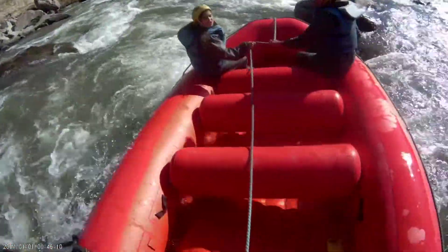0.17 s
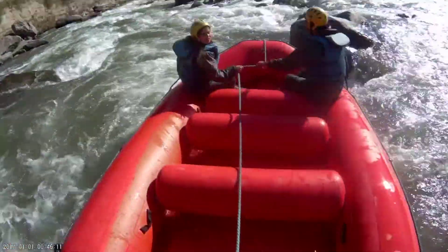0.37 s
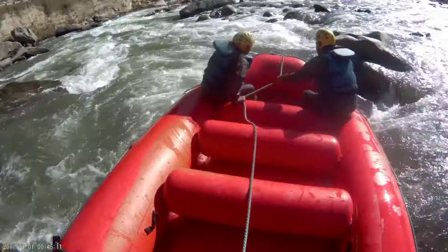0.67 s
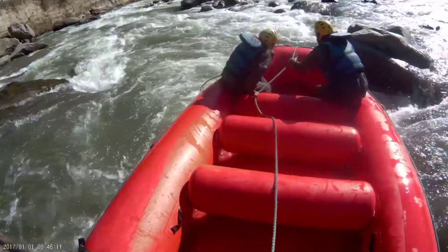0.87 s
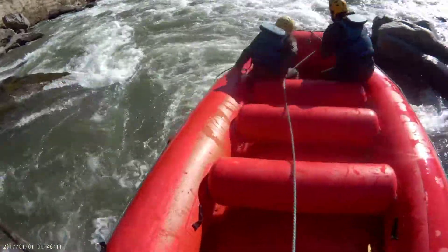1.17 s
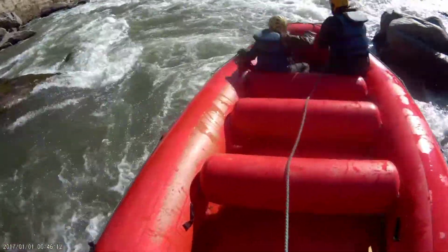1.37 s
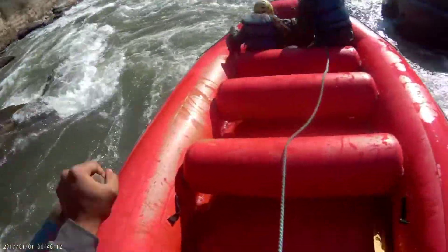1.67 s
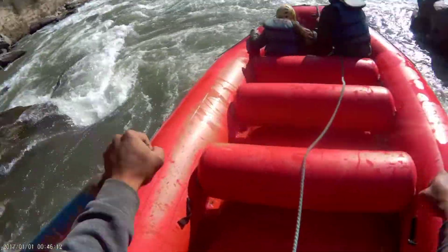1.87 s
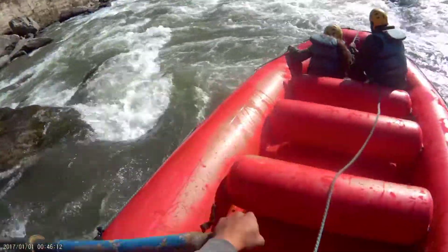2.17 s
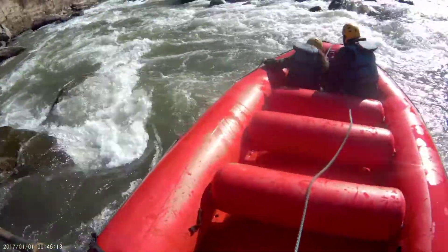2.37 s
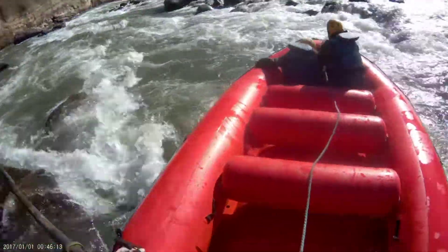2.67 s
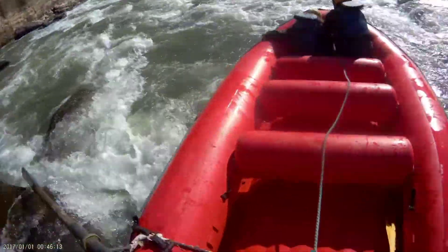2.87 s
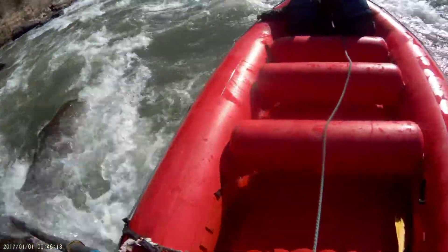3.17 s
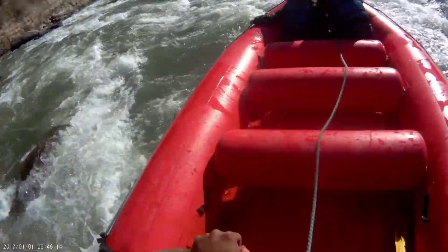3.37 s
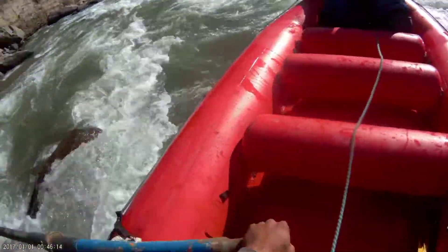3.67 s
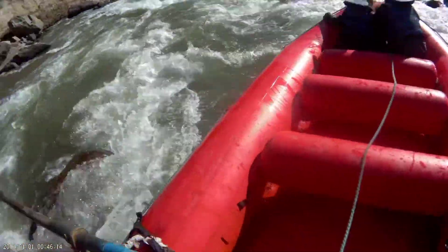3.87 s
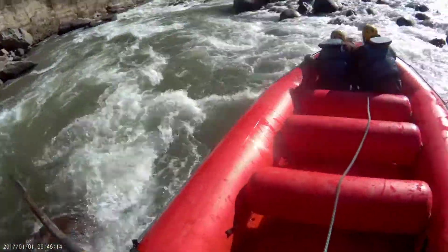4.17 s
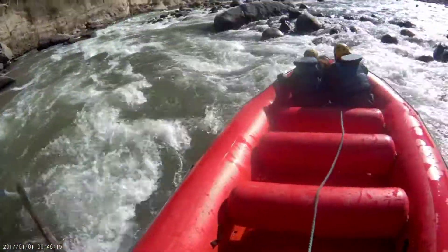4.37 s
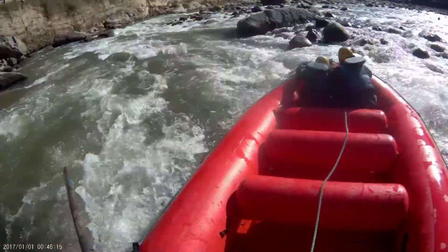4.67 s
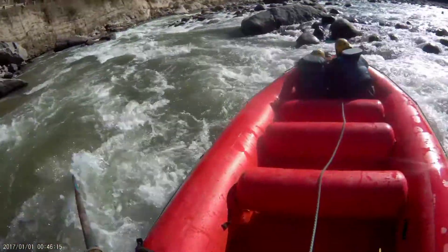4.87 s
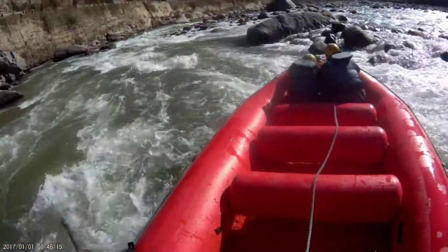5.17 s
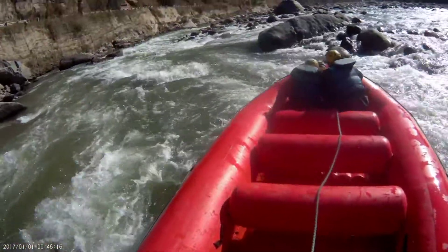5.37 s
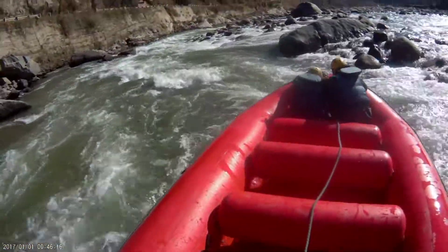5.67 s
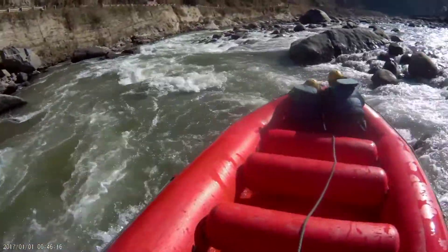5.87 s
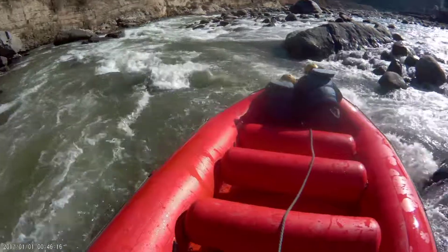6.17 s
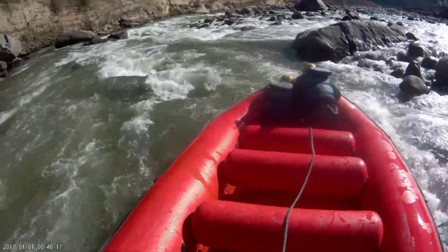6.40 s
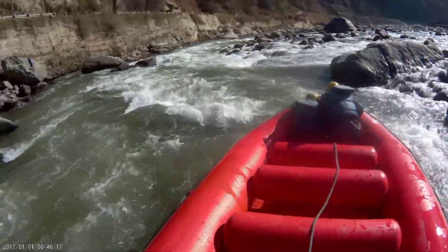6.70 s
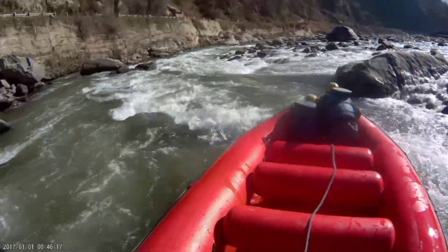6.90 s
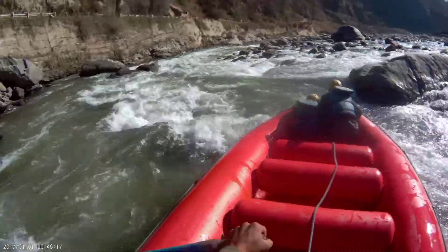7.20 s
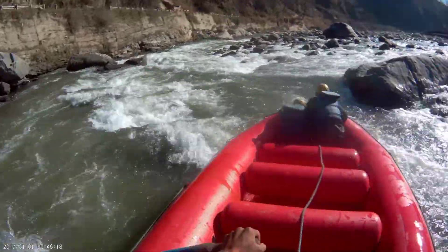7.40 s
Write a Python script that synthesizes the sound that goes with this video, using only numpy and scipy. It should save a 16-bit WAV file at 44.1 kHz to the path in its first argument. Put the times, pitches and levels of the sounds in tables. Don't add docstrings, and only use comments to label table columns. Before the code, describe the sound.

Constant river rapids heard through a closed plastic shell, with clustered low thumps, sharp raps and loose chattering clicks as the wearer moves.

```python
import sys
import numpy as np
from scipy import signal
from scipy.fft import rfft, irfft
from scipy.io import wavfile
from scipy.ndimage import uniform_filter1d

SR = 44100
rng = np.random.default_rng(int(sys.argv[2]) if len(sys.argv) > 2 else 0)


def inscribe(sig):
    pcm = np.round(np.clip(np.atleast_2d(sig).T, -1, 1) * 32767)
    wavfile.write(sys.argv[1], SR, pcm.astype(np.int16))


def attenuation_scalar(level_db):
    decades = np.asarray(level_db, float) / 20
    return 10 ** decades


N = 332514

# t/s, roar level/dB, distant spray above its mean/dB
RIVER_SWELL = [(0.0, -48.5, 1), (0.17, -48.5, 0), (0.75, -48.5, 0), (1.07, -49.5, 1), (1.89, -48.5, 0),
               (2.9, -47.5, 3.5), (3.15, -48.5, 1), (4.03, -49.5, 1), (4.74, -47.5, 1.5), (5.75, -48, -1),
               (6.0, -48.5, -1), (7.41, -49.5, 0), (7.54, -48, 1)]
# f/Hz, density/dB per Hz
WATER_SPECTRUM = [(30, -9.5), (52, -15.5), (200, -14), (450, -11.5), (1000, -16.5), (1800, -11.5),
                  (2350, -35), (2650, -22), (3200, -24.5), (4600, -25), (5500, -29.5), (8000, -36),
                  (12000, -37.5), (15600, -44.5)]
# f/Hz, width/Hz, level/dB
SHELL_HUMPS = [(543, 22.3, -3), (865, 150, -12), (1312, 130, 0), (1614, 51.5, -2.5), (1925, 200, -12),
               (2200, 323, -6.5), (3688, 555, -14.5), (4500, 360, -26.5), (6550, 140, -29.5),
               (11500, 1500, -41)]
# f/Hz, level/dB, T60/s, polarity at the microphone
CASE_MODES = [(57, -11.9, 0.185, 1), (93, -19.2, 0.05, 1), (156, -12.5, 0.069, 1), (252, -12.4, 0.044, 1),
              (294, -20.4, 0.06, 1), (372, -24.6, 0.03, 1), (446, 6.8, 0.002, -1), (566, -35.5, 0.166, -1),
              (744, -6.8, 0.007, 1), (945, -23.7, 0.07, -1), (1149, -15.3, 0.033, -1),
              (1268, -5.5, 0.033, -1), (1543, 8.6, 0.015, -1), (1690, -11.1, 0.057, -1),
              (1994, 21.6, 0.006, 1), (2440, 17.4, 0.016, -1)]
# t/s, blow level/dB, swing re ring/dB, chatter re blow/dB
FRONT_RAPS = [(0.1447, -11, 0.2, -9), (0.5023, -32.5, -14, 2), (0.5694, -13, -6.5, -20),
              (0.594, -29, -8, 4.5), (0.604, -31.5, 8, -3), (0.6883, -23, -15, -8), (.767, -17, 0.5, -12),
              (1.175, -11.5, -1.5, -4), (1.1843, -18.5, 0.5, 0), (1.413, -17, 4.3, -10),
              (2.8661, -30.5, -6, 5), (2.8707, -18.5, 0, -10), (2.8974, -21.9, 4, -7), (2.9074, -23, 0, -6),
              (2.9692, -14.3, -2, -12.5), (4.6535, -14, -7, -16), (4.8177, -33, -8, 11.5),
              (4.8265, -36, -14, -8), (4.8391, -28, 8.5, -12), (4.9013, -31, 1, -15),
              (5.1378, -10.5, -4.5, -15.5), (5.362, -22, 1.5, -7.5), (5.5845, -45, 14.5, -12),
              (5.7082, -36, 1, 3), (5.8395, -18, -7, -13), (6.0403, -6.5, -6.5, -6),
              (6.0538, -25, -15, -10), (6.0614, -15, -4, -14), (6.3143, -51, 2, 5)]
# t/s, blow level/dB, contact/ms, swing re ring/dB
BACK_THUDS = [(0.417, -14, 1.47, -8.5), (0.5027, -31.5, 2.1, 11.5), (0.6771, -11, 0.53, -0.8),
              (0.7022, -12.5, 2.2, -3.5), (0.787, -21, 0.55, 2.5), (0.8592, -15.5, 0.84, -4),
              (0.9598, -20, 1.4, -8), (1.0453, -18.5, .6, 4), (1.0704, -33.9, 1.6, 19),
              (1.1674, -36, 2.2, -3.3), (1.191, -7.5, 2.3, -10.5), (1.2844, -27, 1.3, 6.5),
              (1.358, -23.5, 1.6, -5.2), (1.3866, -6, 1.65, -23), (1.4206, -17.2, 0.71, -24),
              (2.7306, -15.5, 1.5, -4.5), (2.7579, -14, 2.2, -9), (2.9137, -16, 0.99, -10),
              (4.5821, -8.9, 1.3, -3.5), (4.5919, -24, 0.23, 7), (4.6055, -21.6, 0.48, 4.5),
              (4.8204, -7.5, 0.48, -3), (5.0066, -40.5, 0.77, 15.5), (5.224, -22.5, 0.22, 0),
              (5.7276, -17, 0.26, -3), (5.9763, -36.5, 1.1, 16), (6.0478, 0, 1.6, -27),
              (6.095, -39, 2.1, 10), (6.3112, -34.5, 0.17, -6), (6.8596, -15.5, 1.74, -8)]
# t/s, blow level/dB, contact/ms, swing re ring/dB
PADDED_BUMPS = [(.0008, -20.5, 0.62, -2.5), (0.1683, -22, 1.1, -4), (0.4372, -19, 1.9, -14),
                (0.5768, -27, 0.41, -10), (0.5872, -15, 1.4, -13), (0.5893, -33, 2.5, 18),
                (0.5988, -22, 0.8, -12), (.6954, -23, 0.73, -9), (0.7125, -24, .6, -18),
                (0.7823, -18, 0.48, -21), (0.8792, -8, 2, -20), (0.929, -11.5, 0.95, -6),
                (.942, -19.5, 0.25, -3), (1.0156, -18.7, 1.5, -12), (1.054, -45, 1.3, 11),
                (1.2027, -19, 1.6, -11), (1.3674, -16, 0.25, -6), (1.3976, -7, 4.2, -12),
                (2.6304, -23, 0.38, 2), (2.989, -26, .4, -17), (3.074, -24, 0.25, -1), (3.096, -24, 1.2, 4),
                (3.1231, -22.5, 0.25, 0.5), (4.573, -16, 1.4, -6), (4.8114, -26, 1.5, -20),
                (5.2123, -35, 1.4, 16), (6.058, -49, 1.6, 11), (6.064, -15, .6, -4), (6.2596, -22, 1.1, -2),
                (7.474, -23, 1.15, -10)]
# f/Hz, width/Hz, level/dB
CHATTER_MODES = [(336, 220, 5.5), (565, 95, 5), (938, 68, 4.5), (1350, 130, 4), (1780, 850, -51),
                 (2003, 130, 5)]
# t/s, peak level/dB, f/Hz
PART_CLINKS = [(.004, -36, 4500), (.012, -46, 4700), (.576, -39, 4500), (0.583, -39, 4550),
               (.592, -41, 4450), (1.186, -47, 4300), (4.823, -49, 4670), (4.833, -43, 4800),
               (5.145, -40, 4350), (5.152, -41, 4600), (5.157, -39, 4600), (5.225, -43, 4270),
               (6.0392, -37, 3980), (6.048, -27, 4250), (6.0508, -27.5, 3920), (6.051, -51, 6000),
               (6.9182, -43, 4300)]
# t/s, peak level/dB, upper mode re lower/dB
LATCH_PINGS = [(0.0314, -43.5, -4), (0.5022, -34.5, -13), (0.6758, -48, -8), (0.8573, -46, -2),
               (1.1854, -50, 3), (2.727, -43, 4), (4.8215, -41.5, -8), (5.722, -38, -15),
               (5.9743, -41.5, -16), (6.9164, -42, -10), (7.0493, -44, -3)]
# t/s, peak level/dB
DRY_SNAPS = [(.5042, -34), (.6035, -36), (.6995, -29), (.7212, -33), (1.1772, -45), (1.4015, -41),
             (2.8665, -41), (4.6512, -42), (4.8235, -35), (4.8335, -35), (4.8677, -42), (5.1412, -39),
             (5.153, -38), (5.2254, -41), (5.7085, -44), (6.0497, -31), (6.0519, -33), (6.3115, -43)]
# start t/s, end t/s, level/dB
TREBLE_LOSSES = [(0.113, .175, -60), (0.495, .577, -45), (.577, 0.59, -28), (0.755, 0.788, -29),
                 (1.171, 1.202, -38), (2.96, 2.993, -32), (4.627, 4.656, -14), (5.1, 5.17, -14),
                 (5.128, 5.15, -25), (5.812, 5.872, -72), (6.033, 6.064, -55)]

ROAR_OVER_DB, WASH_DB = 2.5, -3
BUBBLES_PER_S, BUBBLES_DB = 2500, -12
SPRAY_DB, SPRAY_FROM_HZ = 0.5, 5900
RUMBLE_HZ, RUMBLE_REF_DB = 268, -67.5
STILL_DB, MOVING_DB, MOVING_S = -63.5, 2.5, 0.1
BLOW_DB, SWING_DB, RAP_MS = -0.57, 1.67, 0.217
REBOUND_S, REBOUND_DB = 0.0046, -17
CHATTER_DB, CHATTER_DB_PER_MS = -12, -6
SNAP_CHATTER_DB, RATTLE_DB, RATTLE_T60_S = 3, -7, 0.042
DULL_FROM_MS, DULL_HZ = 0.25, 750
LATCH_HZ, LATCH_T60_S = (3260, 4250), (0.02, 0.012)
TREBLE_LOSS_FROM_HZ = 8700
HOLES_FROM_HZ, HOLES_SHARE, HOLES_DB = 9500, 0.2, -23


def evened(x):
    return x / np.sqrt(np.mean(x ** 2) + 1e-20)


def add(mix, start_s, sound):
    part = mix[max(round(start_s * SR), 0):][:len(sound)]
    part += sound[:len(part)]


def bubbles(spread_db, cycles):
    out = np.zeros(N)
    for hz in np.geomspace(300, 14000, num=28):
        u = np.arange(int(cycles / hz * SR)) / SR * hz
        grain = np.sin(2 * np.pi * u * (1 + 0.019 * u)) * np.sin(np.pi * u / cycles) ** 2
        size = attenuation_scalar(spread_db * np.minimum(rng.exponential(1, N), 4))
        bursts = size * (rng.random(N) < BUBBLES_PER_S / 28 / SR)
        out += np.sqrt(hz) * evened(signal.oaconvolve(bursts, grain)[:N])
    return evened(out)


def case_colour(hz):
    f, db = np.transpose(WATER_SPECTRUM)
    slope = attenuation_scalar(np.interp(np.log(hz + 1), np.log(f + 1), db)) ** 2
    humps = 0
    for f, width_hz, db in SHELL_HUMPS:
        humps = humps + attenuation_scalar(db) ** 2 / (1 + (2 * (hz - f) / width_hz) ** 2) ** 2
    return np.sqrt(slope + humps)


def blows():
    def soft_chatter_db(db, ms):
        return db + CHATTER_DB + CHATTER_DB_PER_MS * ms

    raps = [(s, db, 1, RAP_MS, swing, db + chatter) for s, db, swing, chatter in FRONT_RAPS]
    thuds = [(s, db, -1, ms, swing, soft_chatter_db(db, ms)) for s, db, ms, swing in BACK_THUDS]
    bumps = [(s, db, 1, ms, swing, soft_chatter_db(db, ms)) for s, db, ms, swing in PADDED_BUMPS]
    rebounds = [(s + REBOUND_S, db + REBOUND_DB, -1, RAP_MS, 0, db + 2 * REBOUND_DB)
                for s, db, _, _ in FRONT_RAPS]
    return raps + thuds + bumps + rebounds


def rumble_db(t):
    crowd = sum(np.exp(-((t - blow[0]) / MOVING_S) ** 2 / 2) for blow in blows())
    return STILL_DB + MOVING_DB * np.log10(1 + crowd)


def river(patchy_db, flicker_db):
    raw = attenuation_scalar(WASH_DB) * rng.standard_normal(N)
    raw += attenuation_scalar(BUBBLES_DB) * bubbles(spread_db=2.5, cycles=5.95)
    hz, t, z = signal.stft(raw, SR, nperseg=1024, noverlap=768)

    patches = uniform_filter1d(rng.standard_normal(z.T.shape), size=8, axis=0)
    patches = evened(uniform_filter1d(patches, size=14, axis=1)).T
    flicker = evened(uniform_filter1d(rng.standard_normal(len(t)), size=5))

    s, body_db, swell_db = np.transpose(RIVER_SWELL)
    roar_db = body_db + ROAR_OVER_DB
    low = 1 / (1 + (hz[:, None] / RUMBLE_HZ) ** 4)
    far = 1 / (1 + (SPRAY_FROM_HZ / (hz[:, None] + 1)) ** 4)
    low_db = rumble_db(t) - RUMBLE_REF_DB - 48.5
    spray_db = np.mean(roar_db) + SPRAY_DB + np.interp(t, s, swell_db)
    level_db = (1 - low) * np.interp(t, s, roar_db) + low * low_db
    level_db = (1 - far) * level_db + far * spray_db
    level_db = level_db + patchy_db * patches + flicker_db * flicker * (1 - far)

    band = (hz > 1000) & (hz < 6000)
    gain = case_colour(hz) / np.sqrt(np.sum(case_colour(hz[band]) ** 2) / len(hz))
    z = z * gain[:, None] * attenuation_scalar(level_db)
    return signal.istft(z, SR, nperseg=1024, noverlap=768)[1][:N]


def knocks():
    t, lead_s = np.arange(8192) / SR, 0.009
    modes = [way * attenuation_scalar(db - 60 * t / t60_s) * np.cos(2 * np.pi * hz * t)
             for hz, db, t60_s, way in CASE_MODES]
    swing, ring = rfft(modes[0], 16384), rfft(sum(modes[1:]), 16384)
    omega = 2 * np.pi * np.fft.rfftfreq(16384, 1 / SR)
    out = np.zeros(N + SR)
    for s, db, way, contact_ms, swing_db, _ in blows():
        delay_s = lead_s + s - round(s * SR) / SR
        push = np.exp(-1j * omega * delay_s - (omega * contact_ms / 1000) ** 2 / 2)
        struck = irfft((attenuation_scalar(swing_db + SWING_DB) * swing + ring) * push)[:8192]
        add(out, s, way * attenuation_scalar(db + BLOW_DB) * struck)
    return out[round(lead_s * SR):][:N]


def rattles(grain_db):
    t = np.arange(4000) / SR
    hard, soft = np.zeros(N), np.zeros(N)
    shakes = [(s, db, ms > DULL_FROM_MS) for s, _, _, ms, _, db in blows()]
    shakes += [(s, db + SNAP_CHATTER_DB, False) for s, db in DRY_SNAPS]
    for s, db, dull in shakes:
        noise, size = rng.standard_normal((2, 4000))
        lumps = attenuation_scalar(grain_db * evened(uniform_filter1d(size, size=40)))
        decay = attenuation_scalar(db + RATTLE_DB - 60 * t / RATTLE_T60_S)
        run = decay * evened(noise * lumps) * np.minimum(t / 0.0012, 1)
        add(soft if dull else hard, s, run)

    shell = np.zeros(len(t))
    for hz, width_hz, db in CHATTER_MODES:
        decay = np.exp(-np.pi * width_hz * t)
        shell += attenuation_scalar(db) * np.sqrt(width_hz) * decay * np.sin(2 * np.pi * hz * t)
    drive = hard + signal.lfilter(*signal.butter(2, DULL_HZ, fs=SR), soft)
    rung = signal.oaconvolve(drive, shell / np.linalg.norm(shell))[:N]
    return signal.sosfilt(signal.butter(4, 2700, fs=SR, output="sos"), rung)


def small_ring(hz, t60_s):
    t = np.arange(900) / SR
    onset = np.sin(np.pi / 2 * np.minimum(t / 0.0014, 1)) ** 2
    return attenuation_scalar(-60 * t / t60_s) * np.sin(2 * np.pi * hz * t) * onset


def clinks(t60_s):
    out = np.zeros(N)
    for s, db, hz in PART_CLINKS:
        add(out, s, attenuation_scalar(db + 8) * small_ring(hz, t60_s))
    return out


def latch(ping_db):
    out = np.zeros(N)
    lower, upper = [small_ring(hz, t60_s) for hz, t60_s in zip(LATCH_HZ, LATCH_T60_S)]
    for s, db, upper_db in LATCH_PINGS:
        add(out, s + 0.00102, attenuation_scalar(db + ping_db) * (lower + attenuation_scalar(upper_db) * upper))
    return out


def snaps(t60_s):
    t, out = np.arange(900) / SR, np.zeros(N)
    band = signal.butter(6, [1800, 5200], "band", fs=SR, output="sos")
    for s, db in DRY_SNAPS:
        force = (t == 0) + 0.47 * rng.standard_normal(900)
        snap = signal.sosfilt(band, force * attenuation_scalar(-60 * t / t60_s))
        add(out, s, attenuation_scalar(db) * snap / abs(snap).max())
    return out


def scene():
    water = river(patchy_db=1.01, flicker_db=1.24)
    chatter = rattles(grain_db=6.5)
    small_parts = clinks(t60_s=0.006) + latch(ping_db=3.0) + snaps(t60_s=0.002)
    return (water + knocks() + chatter + small_parts)[None]


def treble_losses(x):
    t, kept_db = np.arange(N) / SR, np.zeros(N)
    for start_s, end_s, db in TREBLE_LOSSES:
        kept_db += db * ((t > start_s) & (t < end_s))
    highpass = signal.firwin(401, TREBLE_LOSS_FROM_HZ, pass_zero=False, window=("kaiser", 8), fs=SR)
    treble = signal.oaconvolve(x, highpass[None], "same")
    return x - treble * (1 - uniform_filter1d(attenuation_scalar(kept_db), size=130))


def holes(x):
    hz, t, z = signal.stft(x, SR, nperseg=1024, noverlap=768)
    draw = rng.random((len(t) // 8 + 1, len(hz) // 4 + 1))
    draw = draw.repeat(8, axis=0).repeat(4, axis=1)[:len(t), :len(hz)].T
    chance = HOLES_SHARE * np.clip((hz - HOLES_FROM_HZ) / 4500, 0, 1.2)
    z = z * attenuation_scalar(HOLES_DB * (draw < chance[:, None]))
    return signal.istft(z, SR, nperseg=1024, noverlap=768)[1][:, :N]


def low_pass(x):
    return signal.sosfilt(signal.butter(12, 15660, fs=SR, output="sos"), x)


def record(dry):
    mix = holes(treble_losses(dry))
    return low_pass(mix)


dry = scene()
out = record(dry)
inscribe(out)
```